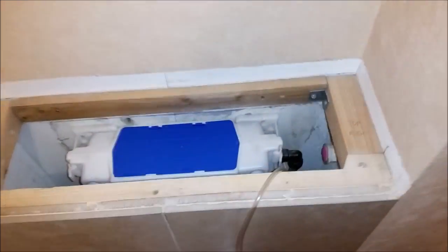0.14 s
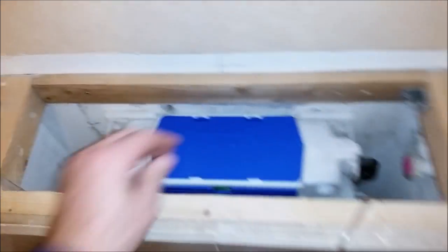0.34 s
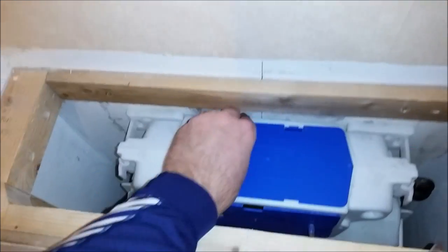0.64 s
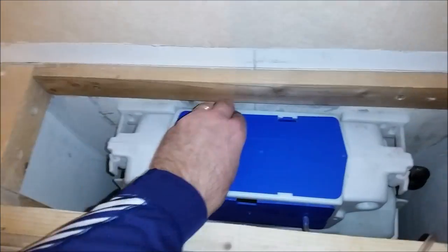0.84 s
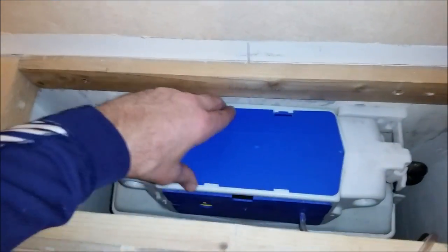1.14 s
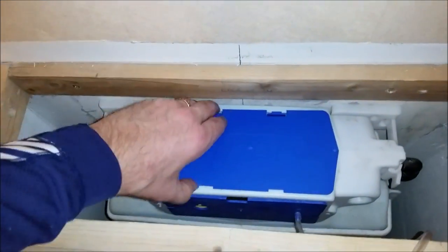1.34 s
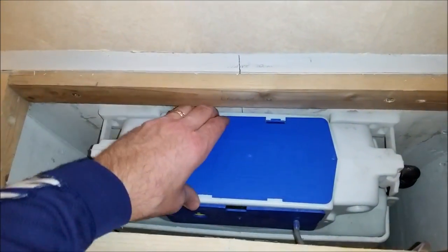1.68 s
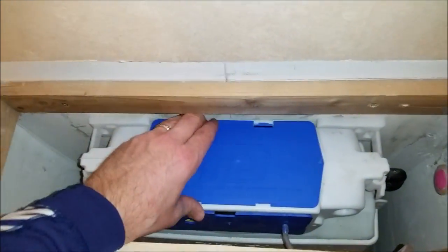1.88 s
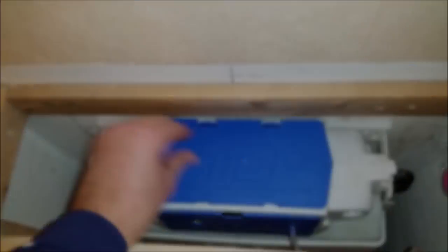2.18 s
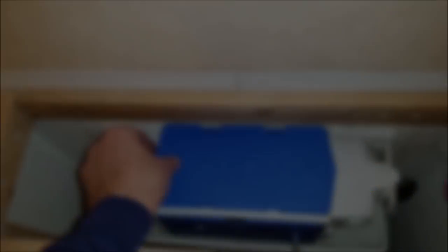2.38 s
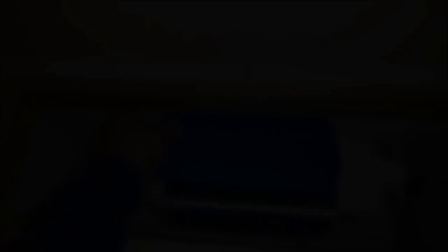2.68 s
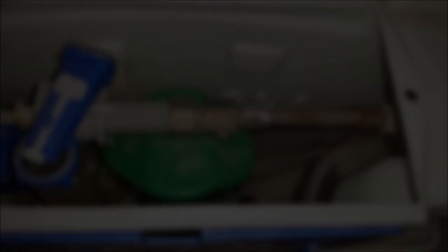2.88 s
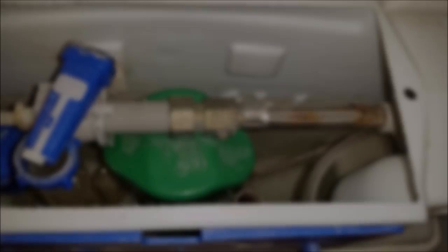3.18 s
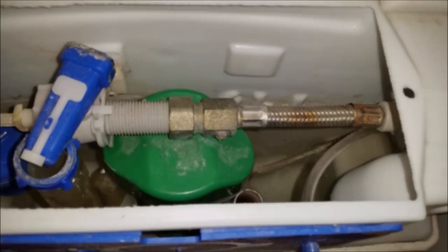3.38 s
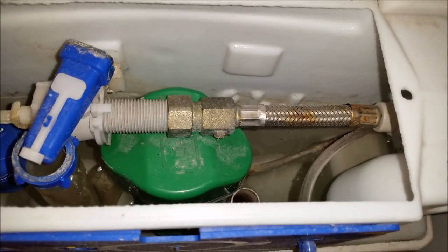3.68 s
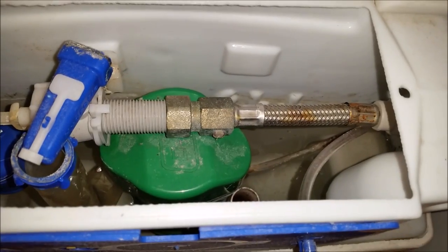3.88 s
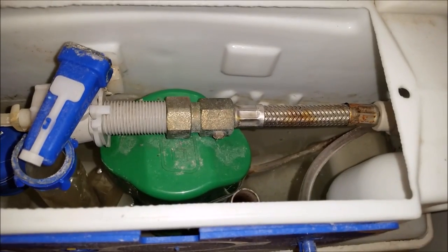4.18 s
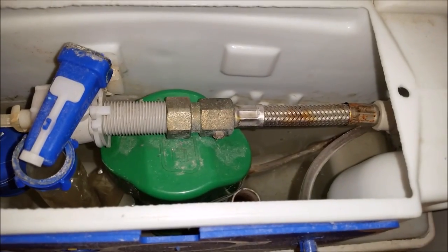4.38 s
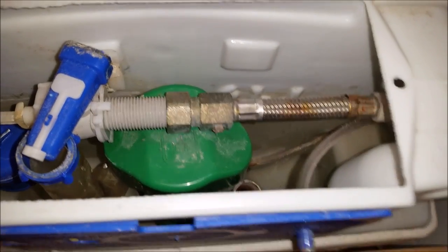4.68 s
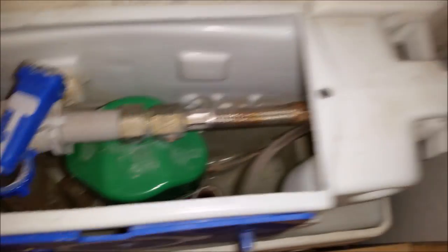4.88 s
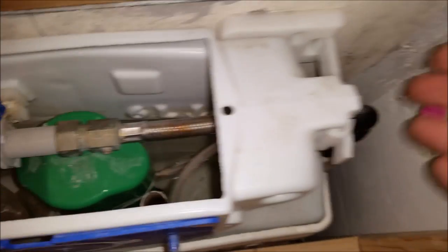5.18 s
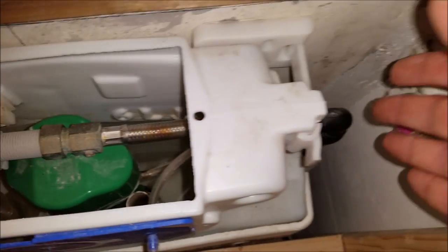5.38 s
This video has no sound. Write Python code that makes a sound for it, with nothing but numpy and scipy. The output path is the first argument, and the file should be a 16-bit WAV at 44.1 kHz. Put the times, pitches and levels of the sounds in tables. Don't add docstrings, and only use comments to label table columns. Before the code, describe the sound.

Hollow plastic lid knocks, clicks and scrapes as it is prised loose by hand, clatters free, then the small tiled bathroom falls quiet.

```python
import sys
import numpy as np
from scipy import signal
from scipy.fft import rfft, irfft, next_fast_len
from scipy.io import wavfile
from scipy.ndimage import map_coordinates

SR = 44100
rng = np.random.default_rng(int(sys.argv[2]) if len(sys.argv) > 2 else 0)


def volts_from_db(level):
    exponent = np.asarray(level, float) / 20
    return 10 ** exponent


def transcribe(u):
    v = np.clip(np.atleast_2d(u).T, -1, 1)
    q = np.round(v * 32767).astype(np.int16)
    wavfile.write(sys.argv[1], SR, q)


N = 243873
FREED_S, LAID_DOWN_S = 2.0, 2.9


def unit(x):
    return x / np.sqrt(np.mean(x ** 2) + 1e-20)


def along(points, hz):
    f, v = np.transpose(points)
    return np.interp(np.log(hz + 1), np.log(f + 1), v)


def curve(rows):
    s, value = np.transpose(rows)
    return np.interp(np.arange(N) / SR, s, value)


def wobble(rate_hz):
    knots = rng.standard_normal(int(N * rate_hz / SR) + 4)
    return map_coordinates(knots, [np.arange(N) * rate_hz / SR])


def filtered(x, response):
    m = next_fast_len(x.shape[-1] + 8192)
    return irfft(rfft(x, m) * response(np.fft.rfftfreq(m, 1 / SR)), m)[..., :x.shape[-1]]


def below(corner_hz, order):
    return lambda hz: 1 / (1 + (hz / corner_hz) ** order)


def coloured(x, spectrum):
    grid_hz = np.fft.rfftfreq(4096, 1 / SR)
    rms = np.sqrt(np.mean(volts_from_db(along(spectrum, grid_hz)) ** 2))
    return filtered(x, lambda hz: volts_from_db(along(spectrum, hz)) / rms)


def pair(spectrum, alike):
    def mid_side(hz):
        turn = np.arccos(np.clip(along(alike, hz), -1, 1)) / 2
        return volts_from_db(along(spectrum, hz)) * [np.cos(turn), np.sin(turn)]
    mid, side = filtered(rng.standard_normal((2, N)), mid_side)
    return unit(np.array([mid + side, mid - side]))


def add(track, s, sound, pan_db):
    start = round(s * SR)
    start, sound = max(start, 0), sound[..., max(-start, 0):]
    track[:, start:start + sound.shape[-1]] += sound * volts_from_db([[pan_db / 2], [-pan_db / 2]])


def gritty(grit_db, rate_hz):
    return unit(volts_from_db(grit_db * wobble(rate_hz)) * rng.standard_normal(N))


def strokes(rows, rise_db_s, fall_db_s):
    t = np.arange(N) / SR
    s, length, db = np.array(rows)[:, :3].T[:, :, None]
    early, late = np.clip(s - t, 0, None), np.clip(t - s - length, 0, None)
    return volts_from_db(db - rise_db_s * early - fall_db_s * late)


def until(end_s):
    return np.clip((end_s - np.arange(N) / SR) / .3, 0, 1)


# f/Hz, level/dB, t60/s
LID_MODES = [(248, -6.5, .13), (310, -6, .13), (368, -6, .13), (436, -1, .15), (505, -13, .08),
             (576, 1, .15), (640, -8, .13), (740, -1, .14), (805, -4, .12), (880, -7, .1), (990, -10, .12),
             (1035, -15, .12), (1252, -20, .1), (1320, -23, .08), (1700, -18, .07), (2020, -16, .05),
             (2370, -16, .05), (2690, -12, .05), (2930, -19, .04)]
# t/s, peak level/dB, snap brightness/dB, favoured
# mode f/Hz
CONTACTS = [(-0.003, -13, -23.5, 248), (0.012, -29, -39, 307), (0.028, -36.5, -34, 300),
            (0.177, -47, -10, 252), (0.415, -38.5, -8, 251), (0.441, -35, -13.5, 310),
            (0.551, -42.5, -32, 716), (0.562, -41.5, -33, 432), (0.633, -35.5, -38, 1000),
            (0.798, -40, -21, 436), (0.82, -37.5, -18, 576), (0.84, -29.5, -15.5, 579),
            (0.872, -30, -24, 565), (0.891, -27, -30, 330), (0.925, -27, -22.5, 440),
            (0.947, -27.5, -27, 333), (0.9635, -13, -33, 367), (0.967, -13.5, -18.5, 570),
            (0.976, -15, -16.5, 282), (0.986, -13, -29, 368), (0.994, -22.5, -11.5, 576),
            (1.0, -27.5, -17, 366), (1.029, -42, -4, 282), (1.135, -38.5, -22, 370), (1.193, -30, -20, 400),
            (1.212, -28, -21, 530), (1.234, -39, -16.5, 570), (1.345, -40, -42, 584), (1.36, -45, -38, 584),
            (1.38, -43, -40, 580), (1.451, -46, -37, 220), (1.499, -36.5, -14.5, 251),
            (1.585, -42.5, -11, 540), (1.625, -35.5, -15.5, 795), (1.68, -43.5, -30, 300),
            (1.603, -34.5, -18, 640), (1.762, -43, -32.5, 242), (1.786, -37, -27, 368),
            (1.843, -35.5, -27, 357), (1.866, -31.5, -21.5, 430), (1.88, -32, -33, 364),
            (1.899, -36, -19, 370), (1.935, -30, -20.5, 340), (1.964, -41.5, -8.5, 290),
            (1.987, -34.5, -22.5, 307),
            (2.026, -21.5, -25.5, 607), (2.0373, -10.5, -17, 847), (2.04, -14.5, -12, 240),
          (2.044, -12, -18, 745), (2.047, -10, -18, 800), (2.058, -18.5, -14, 800),
          (2.067, -21.5, -16.5, 257.9), (2.075, -23, -25, 799), (2.116, -34.5, -8.5, 360),
          (2.227, -37.5, -14, 700), (2.2477, -10.5, -11.5, 576.6), (2.251, -9.5, -11, 444),
          (2.259, -11, -10.5, 463.4), (2.266, -12, -9.5, 578.5), (2.278, -14, -9, 391),
          (2.286, -16.5, -9, 306.4), (2.293, -16.5, -5.5, 640), (2.3065, -17.5, -9, 491.6),
          (2.3106, -9, -12, 578), (2.315, -10, -10.5, 454.8), (2.328, -18, -10, 631),
          (2.337, -20.5, -12.5, 436), (2.4275, -25, -9, 728), (2.478, -33, -12.5, 436.7),
          (2.531, -40.5, -19, 784), (2.557, -31, -17.5, 384), (2.61, -31, -10, 809),
          (2.628, -29, -16.5, 661), (2.679, -18.5, -12.5, 640), (2.682, -18.5, -11.5, 572.6),
          (2.686, -17, -11, 436), (2.691, -20, -11, 579), (2.698, -22, -10.5, 377.8),
          (2.708, -15, -5.5, 742), (2.7125, -8, -14.5, 742), (2.724, -18, -12, 737),
          (2.739, -23.5, -16, 736), (2.776, -15, -19, 640), (2.7825, -9, -11, 576),
          (2.797, -15.5, -15.5, 436), (2.961, -31, -23.5, 1210), (2.991, -35.5, -21, 366),
          (3.067, -49.5, -28, 360), (3.146, -35.5, -16, 250), (3.184, -47, -13.5, 299)]
# f/Hz, level/dB per Hz
SNAP_SPECTRUM = [(680, -36.5), (1150, -8.5), (1250, 4.5), (1480, -9.5), (1650, -1), (1860, -8.5),
                 (2640, -0.5), (3110, -10), (4260, -8.5), (6740, -19), (8570, -20), (15600, -35.5)]


def knocks():
    body, snap, sizzle = np.zeros((3, 2, N + SR))
    t = np.arange(SR // 6) / SR
    hz, level_db, t60_s = np.transpose(LID_MODES)[:, :, None]
    low = hz < 680
    for s, db, bright_db, favoured_hz in CONTACTS:
        chance, noise = rng.standard_normal((len(LID_MODES), 2)), rng.standard_normal((4, len(t)))
        hard = db > -26.5
        rattle_s = np.clip((.003 if hard else .008) * volts_from_db(2 * chance[0, 1]), .001, .03)

        upper_db = -4 if FREED_S < s < LAID_DOWN_S else -17.5
        upper_db += 12.5 * np.log2(favoured_hz / 450)
        near_db = 6 * np.exp(-(np.log(hz / favoured_hz) / .15) ** 2)
        near_db = near_db - 8 * np.clip(np.log2(hz / favoured_hz), 0, 1.3) * low
        near_db = near_db + (hz > 680) * (upper_db + 5)
        near_db = near_db - 3 * low * (favoured_hz > 680)
        high_db = (hz > 1100) * (0.5 + (bright_db + 21.0) * 0.5)

        damping = 1.5 if s > LAID_DOWN_S or hard else 1.35
        mode_db = level_db + near_db + high_db + 2.2 * chance[:, :1] - 60 * t / t60_s * damping
        modes = volts_from_db(mode_db) * np.sin(2 * np.pi * hz * (1 + .006 * chance[:, 1:]) * t)

        rise = 1 - np.exp(-t / (rattle_s * 0.1))
        force = (noise[0] * rise * np.exp(-t / rattle_s * 1.2))[:3000]
        force_at_mode = np.abs(np.exp(2j * np.pi * hz * t[:3000]) @ force)
        modes = modes / force_at_mode[:, None] ** .8
        ring = signal.fftconvolve(modes.sum(axis=0), force)[:len(t)]
        add(body, s, volts_from_db(db + 2.02) * ring / np.abs(ring).max(), pan_db=0.5)

        fade = volts_from_db(-60 * t / (0.085 + 5 * rattle_s)) + 1.6 * volts_from_db(-60 * t / .015)
        crack = volts_from_db(db + bright_db - 9.0) * rise * fade * (noise[1] + 1.3 * noise[2:])
        add(snap, s, crack, pan_db=3.0)
        add(sizzle, s, crack * volts_from_db(1.2 * min(bright_db + 10, 0)), pan_db=0.0)
    low_part = below(5640, 6)
    bright = filtered(snap[:, :N], low_part) + filtered(sizzle[:, :N], lambda f: 1 - low_part(f))
    return body[:, :N] + coloured(bright, SNAP_SPECTRUM)


def resonances(modes, damping):
    def response(f):
        total = 0
        for k, (mode_hz, db, t60_s) in enumerate(modes):
            gain = (-1) ** k * volts_from_db(db - 10 * np.log2(mode_hz / 300) * (mode_hz < 700))
            loss = 1j * f * damping / t60_s
            total = total + gain * loss / (mode_hz ** 2 - f * f + loss)
        return total
    return response


# t/s, length/s, drag level/dB, chatter level re drag/dB
DRAGS = [(0, 0.007, -27.5, -23), (0.649, 0.087, -42.5, -21), (0.839, 0.19, -33.5, -17),
         (0.989, 0.029, -39, -19), (1.19, 0.021, -41, -39), (1.494, 0.16, -47, -16.5),
         (1.815, 0.17, -44, -19.5), (2.058, 0.043, -35.5, -19.5), (2.277, 0.084, -31.5, -16.5),
         (2.44, 0.035, -45, -25), (2.63, 0.19, -32.5, -12), (2.95, 0.012, -50.5, -26),
         (3.239, 0.012, -50, 3), (3.559, 0.04, -53, -5)]


def scrape():
    t = np.arange(N) / SR
    pull = strokes(DRAGS, rise_db_s=699, fall_db_s=311.5)
    idle_db = -11 * (t > LAID_DOWN_S) + 3 * wobble(7.0)
    grit = gritty(grit_db=4, rate_hz=120)
    held_db = -8 * (t < FREED_S)
    drag = filtered(grit, resonances(LID_MODES[:7], damping=13))
    drag = drag - filtered(volts_from_db(held_db) * grit, resonances(LID_MODES[7:11], damping=14))
    chatter = filtered(gritty(grit_db=4, rate_hz=90), resonances(LID_MODES[11:], damping=16))
    drag_gain = pull.sum(axis=0) + volts_from_db(-52.5 + idle_db)
    chatter_gain = volts_from_db(np.array(DRAGS)[:, 3]) @ pull + volts_from_db(-60 + idle_db / 2)
    return volts_from_db(-6.5) * drag_gain * unit(drag) + volts_from_db(-5) * chatter_gain * unit(chatter)


# f/Hz, left lead/rad
PORT_LEAD = [(120, -1.5), (400, 0.06), (2070, 1.5), (2410, 3), (3960, 3), (4740, 8), (6370, 7.5),
             (7490, 11.5), (9650, 18), (10600, 5.5), (12200, -0.5), (12700, 12.5), (14000, 22.5),
             (14800, 18.5), (15300, 24.5)]
# f/Hz, left-right level/dB
PORT_TILT = [(60, -1), (110, -7), (200, -2.5), (380, -1.5), (700, 0.5), (1290, 0.5), (2380, -0.5),
             (4400, -8.5), (8120, -9), (15000, 2.5)]


def at_ports(lid):
    def radiated(hz):
        x = hz / 205
        return (-x ** 2 / (1 + 1.2j * x - x ** 2)) ** 3

    def ports(hz):
        level = volts_from_db(np.outer([.4, -.4], along(PORT_TILT, hz)))
        return level * np.exp(1j * np.outer([.5, -.5], along(PORT_LEAD, hz)))
    lid = filtered(lid, radiated)
    return lid, filtered(lid, ports)


# t/s, level/dB
HOUSE_LEVEL = [(0, -42), (.2, -61.5), (.45, -53.5), (1.05, -60), (1.56, -62.5), (2.15, -56), (2.5, -56),
               (2.77, -52), (2.94, -55), (3.45, -51.5), (3.9, -66), (4.3, -59.5), (4.88, -60.5),
               (5.53, -54)]
# t/s, level/dB
RECESS_LEVEL = [(0, -56.5), (3.0, -57.5), (3.6, -58), (4.0, -69.5), (4.9, -67.5), (5.1, -58), (5.53, -53.5)]
# t/s, level/dB
SLEEVE_LEVEL = [(0, -61), (.4, -74.5), (.63, -69.5), (1.05, -64.5), (1.35, -73), (2.07, -69), (2.25, -63),
                (2.5, -68.5), (2.85, -61), (3.05, -72.5), (3.2, -63.5), (3.4, -76), (4.0, -88)]
# t/s, length/s, level/dB
SLIDES = [(.13, 0.14, -63.5), (.48, 0.066, -65.5), (.8, 0.082, -63.5), (1.08, 0.018, -69),
          (1.48, 0.29, -68.5), (2.07, 0.033, -66), (2.2, .1, -64), (2.65, 0.3, -61.5), (3.3, 0.311, -77)]
# f/Hz, level/dB per Hz
RUMBLE_SPECTRUM = [(12, -34), (30, -5.5), (64, -2), (102, 0.5), (200, -14), (260, -19), (440, -120)]
TONE_SPECTRUM = [(100, -29), (170, -2), (199, -3), (259, -13), (420, -19), (637, -30), (1000, -40),
                 (1430, -60), (2420, -120)]
SKIN_SPECTRUM = [(1880, -48.5), (3200, -11.5), (3650, -4), (3960, -3), (4470, 2.5), (5070, -8.5),
                 (5470, -19.5), (6000, -17.5), (7800, -50), (13200, -120)]
SLEEVE_SPECTRUM = [(2940, -26.5), (5000, 1), (5820, -11.5), (6690, -8), (8170, 1), (9980, -12.5),
                   (11500, -27.5), (13700, -21.5), (15600, -24)]
HISS_SPECTRUM = [(410, -44), (700, -14), (777, -12), (1100, -15), (1720, -16), (2310, -13), (2920, -19),
                 (3460, -15), (3940, 2), (5180, -25), (9910, -27), (12200, -20), (15600, -29)]
# f/Hz, left-right likeness/1
QUIET_ALIKE = [(60, 0.8), (130, 0.43), (290, 0.039), (640, 0.36), (1410, 1), (3100, 0.76), (6820, 1),
               (15000, 0.87)]


def background():
    rumble = unit(volts_from_db(1.5 * wobble(12)) * pair(RUMBLE_SPECTRUM, QUIET_ALIKE))
    rumble = volts_from_db(curve(HOUSE_LEVEL) + 1.5) * rumble
    tone = volts_from_db(curve(RECESS_LEVEL) + 0.3 * wobble(14.0)) * pair(TONE_SPECTRUM, QUIET_ALIKE)
    slide = strokes(SLIDES, rise_db_s=114.5, fall_db_s=114.5).sum(axis=0)
    skin = slide * volts_from_db(3.1 * wobble(31)) * pair(SKIN_SPECTRUM, [(3000, 1.0)])
    sleeve = volts_from_db(curve(SLEEVE_LEVEL) + 2.2 * wobble(30)) * pair(SLEEVE_SPECTRUM, [(3000, 0.47)])
    hiss = volts_from_db(-81) * pair(HISS_SPECTRUM, QUIET_ALIKE)
    return rumble + tone + until(4.0) * (skin + sleeve) + hiss


# t/s, peak level/dB, f/Hz (negative: pull), t60/s, left-right/dB
THUMPS = [(0.0002, -24, 268, 0.059, -7), (2.943, -33.5, 190, 0.041, 4),
          (3.2825, -15.5, 107.5, 0.01565, -19), (2.6, -37, 92, .015, -4.5), (3.507, -44, 399.5, .01, -1),
          (1.451, -41, 300, .012, -3), (1.936, -31.5, 420, .015, 0), (0.174, -42, 300, .015, 0),
          (3.316, -33.5, 121, 0.02, 24), (3.358, -33, 261, 0.017, -4), (3.484, -46, 60, 0.011, -21),
          (3.547, -34, 52, 0.038, -6.5), (3.558, -32.5, -90, 0.029, -23.5), (3.6, -32.5, 192, 0.013, -15.5),
          (4.631, -41, 105, 0.051, 18.5)]


def thumps():
    track, t = np.zeros((2, N + SR)), np.arange(SR // 2) / SR
    for s, db, pitch_hz, t60_s, pan_db in THUMPS:
        sign, pitch_hz = np.sign(pitch_hz), abs(pitch_hz)
        swing = np.clip(t * pitch_hz / .55, 0, 1)
        decay_db = 60 * np.clip(t - .55 / pitch_hz, 0, None) / max(t60_s, .01)
        onset_cycles = .08 if db > -33 else .5
        onset = 1 - np.exp(-(t * pitch_hz / onset_cycles) ** 2)
        push = volts_from_db(db - 5 * (1 - swing) - decay_db) * onset
        phase = 2 * np.pi * pitch_hz * t + 2.1 * (1 - np.exp(-t * pitch_hz / .3))
        add(track, s, sign * push * np.sin(phase), pan_db)
    return track[:, :N]


# t/s, peak level/dB, centre f/Hz, fizz t60/s, left-right/dB
TICKS = [(0.417, -46, 4670, 0.39, -5), (0.5525, -37.5, 2226, 0.27, -2), (0.633, -47, 840, .03, 0),
         (0.641, -38, 980, 0.027, 0), (0.973, -30, 1690, .03, -3), (0.984, -27.5, 1755, .03, 0),
         (0.994, -38, 1800, .03, 0), (1.021, -44, 1980, .03, -2), (0.931, -42.5, 1500, .04, 0),
         (0.875, -47, 2160, .08, 0), (2.037, -22.5, 2700, .03, -7), (2.2532, -25, 2700, .03, -5),
         (2.294, -31, 5150, .03, 4), (2.3114, -21, 2700, 0.033, -5), (2.7085, -20, 2385, .02, 6),
         (2.7125, -34, 4150, 0.018, 8), (2.748, -39, 3200, .02, 0), (2.798, -31, 4420, .02, 0),
         (3.2448, -37.5, 4830, 0.28, -3.5), (3.283, -54, 12000, 0.05, -17),
         (3.424, -63.5, 2560, 0.022, 3.5), (0.093, -45, 8650, .02, -6), (3.3653, -52, 1750, 0.18, 4),
         (3.505, -63, 1940, 0.02, 0), (3.5373, -30.5, 10100, 0.04, -5.5), (3.5404, -33.5, 6900, 0.03, -6.5),
         (3.547, -30.5, 9760, 0.2, -3), (3.5729, -24, 11700, 0.018, -3.5), (3.582, -31.5, 12300, 0.15, -1),
         (3.5825, -43, 1900, 0.72, 2.5), (3.5881, -41.5, 1830, 0.055, 0), (3.6729, -57, 1900, 0.031, 7.5),
         (3.574, -36, 1950, 0.03, -2)]
# f/Hz, level/dB per Hz
FIZZ_SPECTRUM = [(410, -7), (700, -12), (1320, -10), (2280, -7), (3160, -14.5), (3940, -4.5), (6130, -16),
                 (6890, -7.5), (11900, -12.5), (13900, -14.5), (14500, -45)]


def ticks():
    rings, fizz = np.zeros((2, 2, N + SR))
    t = np.arange(SR // 2) / SR
    for s, db, centre_hz, t60_s, pan_db in TICKS:
        noise = rng.standard_normal((4, len(t)))
        late_low = centre_hz < 2200 and s > LAID_DOWN_S
        phase = 2 * np.pi * centre_hz * t + np.cumsum(noise[3]) * 4e-5 * centre_hz
        ring = np.sin(phase) + 0.77 * late_low * np.sin(2.0 * phase)
        ring = ring * volts_from_db(-60 * t / (0.018 if late_low else 0.03)) * (1 - np.exp(-t / 0.00014))
        add(rings, s, volts_from_db(db + 1) * ring, pan_db)
        hiss = filtered(noise[0] + 2.5 * noise[1:3], below(1.7 * centre_hz + 2000, 6))
        fade = volts_from_db(-60 * t / max(t60_s, .005)) + 3 * volts_from_db(-60 * t / 0.0018)
        add(fizz, s, volts_from_db(db - 16.5) * fade * hiss, pan_db)
    return filtered(rings[:, :N], below(14200, 40)) + coloured(fizz[:, :N], FIZZ_SPECTRUM)


# f/Hz, t60/s
TILES = [(150, 0.28), (600, 0.2), (3000, 0.24), (12000, 0.32)]


def room(x):
    hz, t, z = signal.stft(rng.standard_normal((2, SR // 3)), SR, nperseg=256)
    tail = signal.istft(z * volts_from_db(-60 * t / along(TILES, hz)[:, None]), SR, nperseg=256)[1]
    delayed = np.pad(x, (180, 0))[None]
    return signal.fftconvolve(delayed, tail / np.linalg.norm(tail[0]), axes=1)[:, :N]


# t/s, length/s, level/dB
BRUSHES = [(0.068, 0.077, -51.5), (0.546, 0.115, -49.5), (0.698, 0.036, -57), (2.11, 0.05, -57),
           (3.24, 0.04, -53.5), (3.268, 0.096, -63.5)]
# f/Hz, level/dB per Hz
CUFF_SPECTRUM = [(880, -35), (1500, -6.5), (3070, -9), (4540, -0.5), (6460, -8.5), (9110, -8), (15600, -17)]


def cuff():
    t, swell = np.arange(N) / SR, 0
    for s, length, db in BRUSHES:
        swell = swell + volts_from_db(db) * np.sin(np.pi * np.clip((t - s) / length, 0, 1)) ** .6
    return swell * volts_from_db(1.2 * wobble(60)) * pair(CUFF_SPECTRUM, [(3000, 0.44)])


# f/Hz, level/dB, t60/s
CLIP_MODES = [(1830, -8, 0.15), (2240, 4, 0.058), (2300, -6, 0.17), (2360, 13, 0.061), (2600, -4.5, .06),
              (4620, -12.5, 0.2), (4883, -3.5, 0.24), (5770, -24, .2), (8200, -7, 0.09)]
# t/s, peak level/dB, left-right/dB
NAIL_FLICKS = [(0.418, -57, 5), (0.549, -28, 9.5), (0.564, -41, 9), (0.613, -52, 4), (0.63, -46, 2),
               (2.175, -45.5, 1)]


def nail():
    track, t = np.zeros((2, N + SR)), np.arange(SR // 5) / SR
    hz, level_db, t60_s = np.transpose(CLIP_MODES)[:, :, None]
    for s, db, pan_db in NAIL_FLICKS:
        unsteady = 4e-5 * hz * np.cumsum(rng.standard_normal((len(CLIP_MODES), len(t))), axis=1)
        modes = volts_from_db(level_db - 60 * t / t60_s) * np.sin(2 * np.pi * hz * t + unsteady)
        onset = 1 - np.exp(-(t / 0.003) ** 2)
        add(track, s, volts_from_db(db - 12.0) * modes.sum(axis=0) * onset, pan_db)
    return track[:, :N]


def scene():
    lid, lid_at_ports = at_ports(knocks() + until(3.85) * scrape())
    hand = thumps() + ticks() + nail()
    echo = volts_from_db(-10) * room(lid.mean(axis=0) + .35 * hand.mean(axis=0))
    return lid_at_ports + hand + echo + background() + cuff()


def band_limit(x):
    return signal.sosfilt(signal.butter(12, 15770, fs=SR, output="sos"), x)


def record(dry):
    rounded = dry / (1 + np.abs(dry / .6) ** 3) ** (1 / 3)
    mix = filtered(rounded, below(15700, 200))
    return band_limit(mix)


dry = scene()
out = record(dry)
transcribe(out)
```